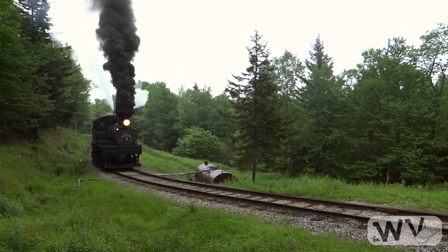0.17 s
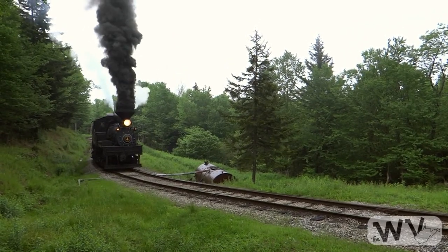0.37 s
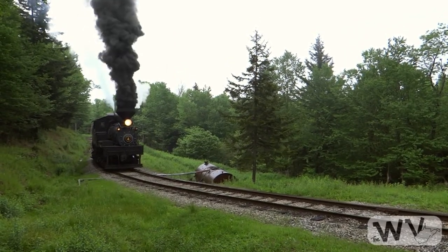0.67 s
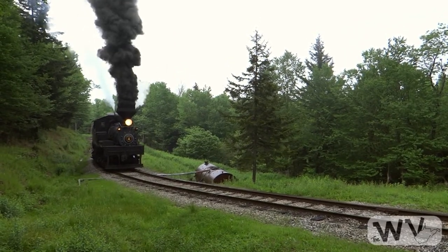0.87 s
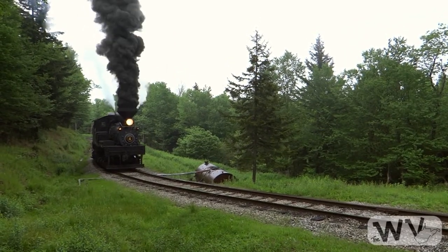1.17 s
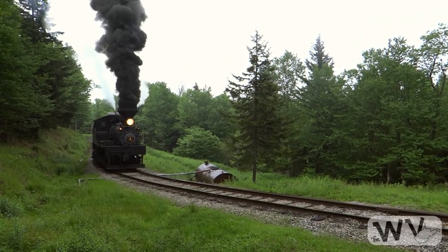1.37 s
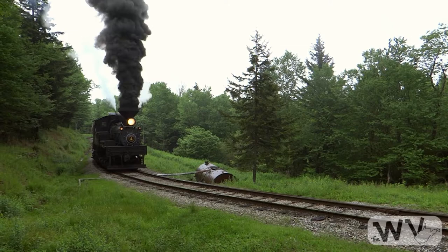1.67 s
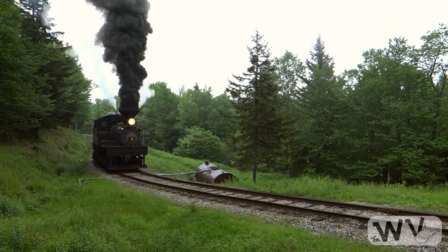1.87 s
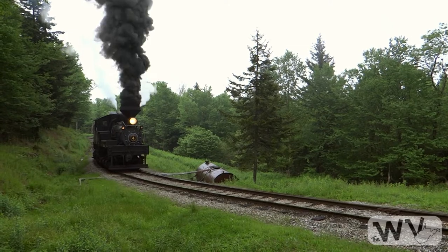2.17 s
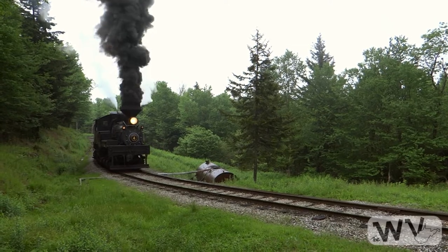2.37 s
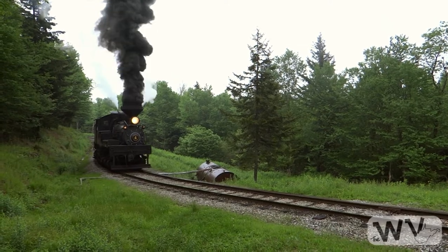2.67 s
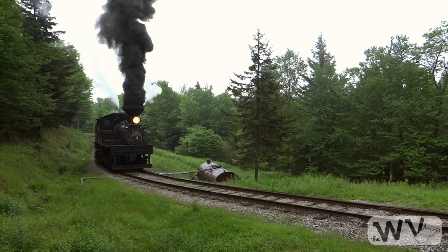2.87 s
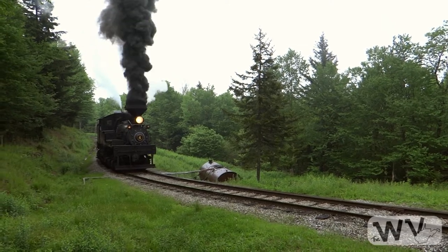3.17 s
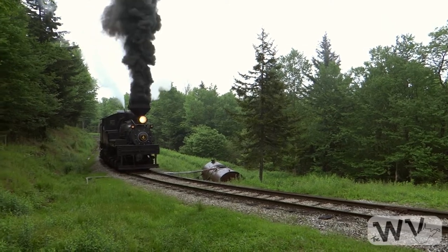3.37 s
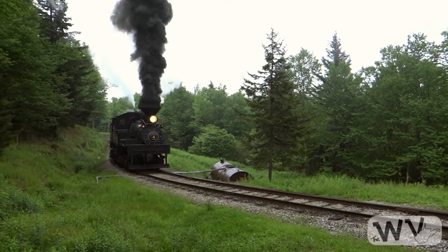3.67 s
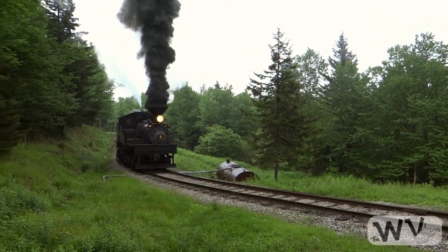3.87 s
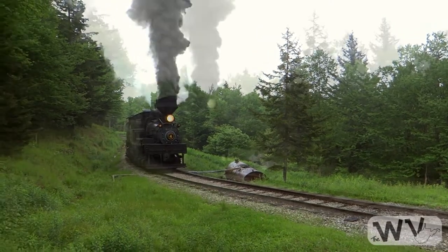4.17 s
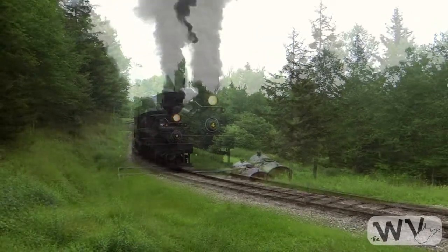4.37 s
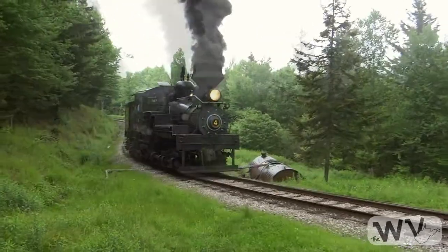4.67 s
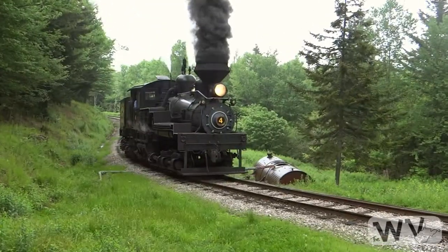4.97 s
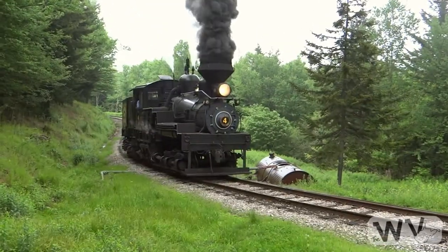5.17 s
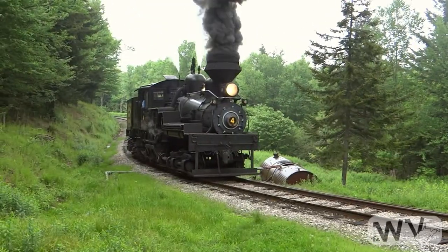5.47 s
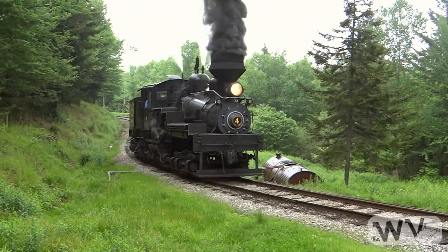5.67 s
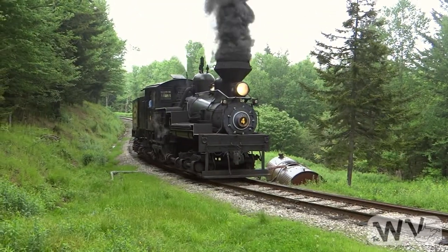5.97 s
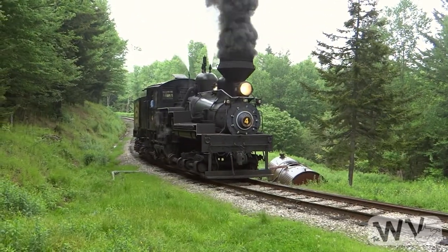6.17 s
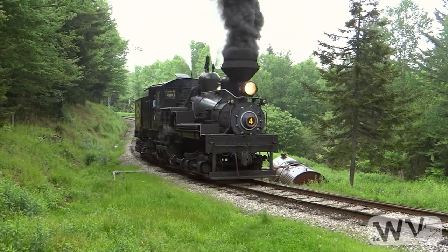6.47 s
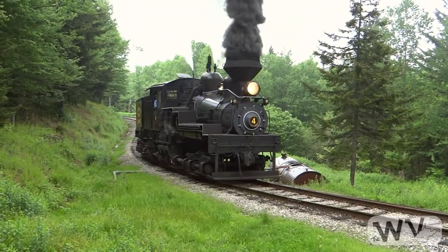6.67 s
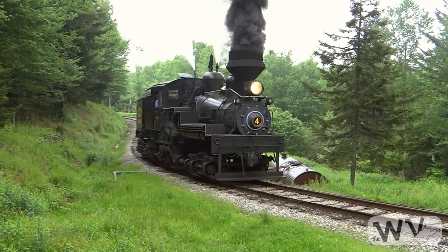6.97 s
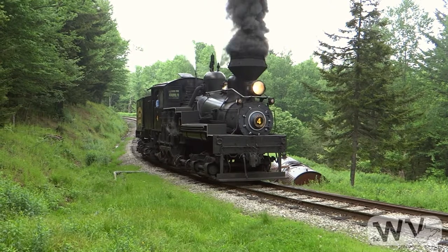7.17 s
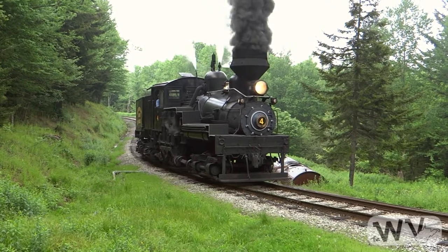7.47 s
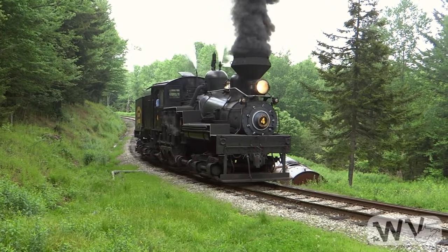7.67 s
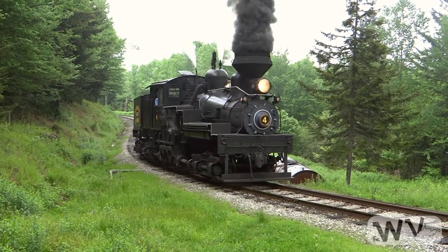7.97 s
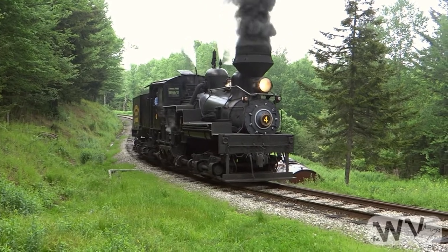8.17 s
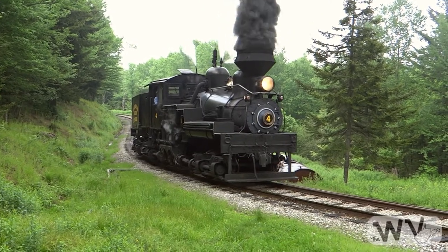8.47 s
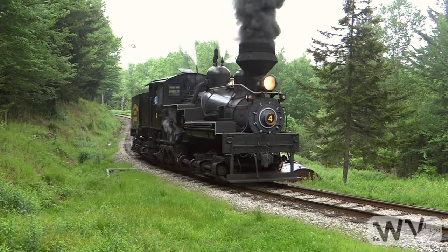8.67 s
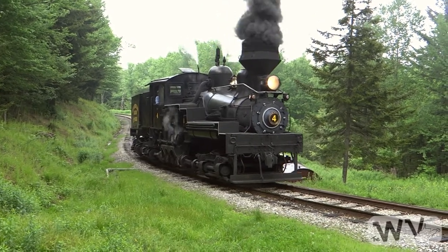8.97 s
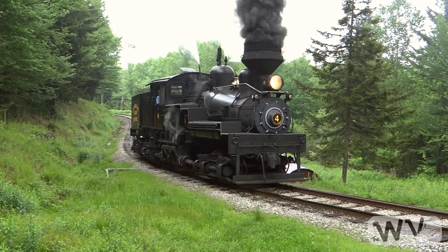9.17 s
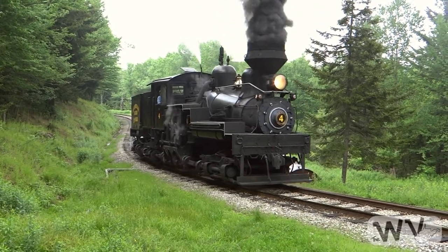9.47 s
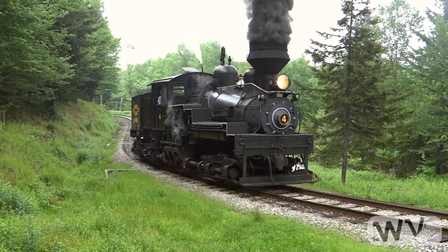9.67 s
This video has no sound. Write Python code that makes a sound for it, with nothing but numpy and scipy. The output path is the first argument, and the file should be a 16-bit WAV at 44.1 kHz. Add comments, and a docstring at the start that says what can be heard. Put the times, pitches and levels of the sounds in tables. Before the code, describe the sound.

Steady hissing steam dominates as a steam locomotive approaches in the open air, with quieter rhythmic chuffs and a faint low rumble pulsing underneath. The sound sinks about halfway through, then builds again with the engine nearer the trackside microphone. A fine, very high whistle from the escaping steam becomes more prominent in the second half, and the hiss brightens in brief spurts near the end.

```python
"""Hissing steam is heard first, with a thin high whistle, as a geared locomotive works up a wooded curve.
The hiss is a turbulent jet and the whistle its edge tone at the valve, heard far off and then close by.
Beneath them the cylinders exhaust about four times a second, each gust ringing the resonances of the
stack, while the running gear gives a low rumble that throbs with the pistons."""
import sys
import numpy as np
from scipy import signal
from scipy.fft import rfft, irfft, next_fast_len
from scipy.io import wavfile

SR = 44100
rng = np.random.default_rng(int(sys.argv[2]) if len(sys.argv) > 2 else 0)


def master(y):
    """Save y as 16-bit WAV."""
    cut = np.clip(np.atleast_2d(y).T, -1, 1)
    pcm = np.round(cut * 32767)  # scale
    wavfile.write(sys.argv[1], SR, pcm.astype(np.int16))


N = 433062
FRAME, HOP = 1024, 256  # samples
HZ = np.fft.rfftfreq(FRAME, 1 / SR)
FRAME_S = np.arange(N // HOP + 5) * HOP / SR
TIME = np.arange(N) / SR


def gain_of(db):
    """Amplitude ratio of a level in decibels."""
    return 10 ** (np.asarray(db) / 20)


def unit_rms(x):
    """Normalisation to rms 1."""
    return x / np.sqrt(np.mean(x ** 2) + 1e-20)


def curve(rows, t, column=1):
    """Linear interpolation of a table column at the times t."""
    rows = np.array(rows)
    return np.interp(t, rows[:, 0], rows[:, column])


def spectrum(points):
    """Interpolation over log frequency, one value per bin."""
    f, value = np.transpose(points)
    return np.interp(np.log(HZ + 1), np.log(f + 1), value)


def band_rms(shape, lo_hz, hi_hz):
    """Power summation: the rms of each frame within a band."""
    return np.sqrt(np.sum(shape ** 2 * ((HZ >= lo_hz) & (HZ <= hi_hz)), axis=-1, keepdims=True))


def fluctuation(seconds, width_hz):
    """Random field of rms 1, correlated over the given spans of time and frequency."""
    white = np.fft.rfft2(rng.standard_normal((len(FRAME_S), FRAME // 2 + 2)))
    along = np.fft.fftfreq(len(FRAME_S), HOP / SR)[:, None] * seconds
    across = np.fft.rfftfreq(FRAME // 2 + 2, SR / FRAME) * width_hz
    smooth = white / np.sqrt(1 + (np.pi * along) ** 2) / (1 + (np.pi * across) ** 2)
    return unit_rms(np.fft.irfft2(smooth)[:, :len(HZ)])


# Blend from the engine heard far off to the engine heard close by: t/s, nearness (0 far, 1 near)
NEARNESS = [(0, 0), (3.6, 0.16), (4.9, 0.92), (6.5, 1), (7.5, 1), (9.8, 1)]
# Common level that every layer follows: t/s, level/dB
ENGINE_LEVEL = [(0, -20.7), (2.05, -20.4), (3.5, -26.2), (4.35, -33.2), (4.7, -32.6), (5.4, -25.5),
                (6, -22.7), (7, -19.7), (8.1, -19.2), (9.1, -20.5), (9.82, -20.2)]


def layer_level(t, far_db, near_db):
    """Gains add in decibels: the engine's level plus a blend of far and near offsets."""
    return curve(ENGINE_LEVEL, t) + far_db + curve(NEARNESS, t) * (near_db - far_db)


def by_nearness(far, near):
    """Interpolation between a far and a near spectrum; frames x bins."""
    share = curve(NEARNESS, FRAME_S)[:, None]
    return (1 - share) * spectrum(far) + share * spectrum(near)


def resonances(modes, hz, near):
    """Steep resonance peaks add in power, each blending its far and near strength."""
    power = 0
    for f, width, far_db, near_db in modes:
        peak = gain_of(far_db + near * (near_db - far_db))
        power += peak ** 2 / (1 + (2 * (hz - f) / width) ** 2) ** 2
    return np.sqrt(power)


# Likeness of left and right, far and near: f/Hz, coherence
COHERENCE_FAR = [(40, 0.91), (150, 0.933), (400, 0.836), (1400, 0.925), (3500, 0.94), (7000, 0.963),
                 (10000, 0.964), (11700, 0.886), (13300, .999)]
COHERENCE_NEAR = [(40, 0.95), (150, 1), (700, 0.891), (1700, 1), (4500, 1), (7000, 0.9646), (10300, 0.955),
                  (11300, 1)]


def stereo_noise(shape):
    """Partial coherence: the channels share most of one noise; shape is the rms per frame and bin."""
    white = rng.standard_normal((2, (len(FRAME_S) - 1) * HOP))
    common, opposed = signal.stft(white, nperseg=FRAME, noverlap=FRAME - HOP)[2].transpose(0, 2, 1)
    coherence = by_nearness(COHERENCE_FAR, COHERENCE_NEAR)
    mid, side = common * np.sqrt((1 + coherence) / 2), opposed * np.sqrt((1 - coherence) / 2)
    frames = np.array([mid + side, mid - side]) * shape * np.sqrt(len(HZ))
    return signal.istft(frames.transpose(0, 2, 1), nperseg=FRAME, noverlap=FRAME - HOP)[1][:, :N]


# Spectrum of the rumble: f/Hz, relative level/dB
RUMBLE_SPECTRUM = [(10, -25), (30, -25), (85, -0.5), (130, -8), (190, 1.5), (260, 5), (390, -8.5),
                   (700, -2), (1500, -38.5)]


def rumble(lumpy_db=3.0, throb_db=4.0, stroke_s=0.059, far_db=-30.5, near_db=-35):
    """Amplitude modulation: the low noise of wheels, gears and fire throbs with each piston stroke."""
    t = FRAME_S[:, None]
    stroke = np.max([np.exp(-((t - s) / stroke_s) ** 2) for s, _, _ in beats()], axis=0)
    shape = gain_of(spectrum(RUMBLE_SPECTRUM))
    swell_db = layer_level(t, far_db, near_db) + throb_db * stroke + lumpy_db * fluctuation(0.054, 287)
    return stereo_noise(shape / band_rms(shape, 0, SR / 2) * gain_of(swell_db))


# Rotation of the crankshaft, far and near: t/s, angle/turns
CRANK_FAR = [(-.035, .28), (1.122, 1), (1.613, 1.312), (2.771, 2), (3.299, 2.313), (4.45, 3.028)]
CRANK_NEAR = [(4.61, .28), (5.634, 1), (6.61, 1.638), (7.463, 2.13), (8.601, 2.8), (9.179, 3.135),
              (9.82, 3.578)]
# Valve openings: angle/turns, relative level far/dB, near/dB, nominal length/s
VALVE_OPENINGS = [(0, -17, -20.5, .053), (.128, -14, -21.5, .065), (0.312, -23, -21, 0.0664),
                  (.463, -22, -21.5, 0.0628), (0.64, -22.5, -22.5, 0.064), (.8, -20.5, -21.5, 0.074)]
# Harder or softer beats: t/s, added level/dB
ACCENTS = [(1.61, 5.5), (6.34, 6.5), (7.78, -6.5), (8.94, 4)]
# Puffs between the beats: t/s, relative level/dB, nominal length/s
STRAY_PUFFS = [(1.467, -20.5, 0.101), (6.222, -23.5, 0.1)]


def beats():
    """Valve timing: three cylinders exhaust six times a turn; rows of t/s, level/dB, nominal length/s."""
    rows = []
    for crank, close in ((CRANK_FAR, False), (CRANK_NEAR, True)):
        times, turns = np.transpose(crank)
        for turn in range(int(turns[-1]) + 1):
            for angle, far_db, near_db, length in VALVE_OPENINGS:
                if turns[0] <= turn + angle <= turns[-1]:
                    s = np.interp(turn + angle, turns, times)
                    accent_db = sum(db for at, db in ACCENTS if abs(at - s) < .1)
                    rows.append((s, (near_db if close else far_db) + accent_db, length))
    return [(s, curve(ENGINE_LEVEL, s) + db, length) for s, db, length in rows + STRAY_PUFFS]


# Modes of stack and smokebox: f/Hz, width/Hz, relative level far/dB, near/dB
STACK_MODES = [(91.3, 36.4, -8.5, -10), (137.8, 27.3, -27.5, -5.5), (184.1, 34.6, -4.5, 1.5),
               (231.7, 40.7, -4, 1), (261, 38.8, 1, -4.5), (331.8, 35.8, -3, -12), (443, 69, -20, -7)]
# Breathy bark of a hard beat: f/Hz, width/Hz, relative level far/dB, near/dB
BARK_BANDS = [(577, 168, -14, -11), (698.5, 40, -12.5, -7.5), (1510, 1830, -23, -15.5)]


def exhaust(stretch=1.37, edge_s=0.00624, tail_db=-16, tail_s=0.069, hard_db=-40, bark_growth=0.43):
    """Forced resonance: each valve opening lets a gust ring the stack, then shuts, leaving a short tail."""
    out, hz = np.zeros(N), np.fft.rfftfreq(SR // 2, 1 / SR)
    t = (np.arange(SR // 2) - SR // 6) / SR  # zero at mid-gust
    for s, db, length in beats():
        half, near = stretch * abs(length) / 2, curve(NEARNESS, s)
        opening = (1 + np.tanh((t + half) / (2 * edge_s))) / 2
        closing = (1 + np.tanh((half - t) / (2 * edge_s))) / 2
        tail = gain_of(tail_db) * np.exp(-abs(t - half) / tail_s)
        flow = opening * (closing + (1 - closing) * tail)
        bark_gain = gain_of(bark_growth * max(db - hard_db, 0))  # harder beats are brighter
        colour = np.hypot(resonances(STACK_MODES, hz, near), bark_gain * resonances(BARK_BANDS, hz, near))
        gust = flow * irfft(colour * np.exp(2j * np.pi * rng.random(len(hz))), len(t))
        gust = gust * gain_of(db) / np.std(gust[abs(t) < .035])
        at = round(s * SR) - SR // 6 + np.arange(len(t))
        inside = (at >= 0) & (at < N)
        out[at[inside]] += gust[inside]
    return out


# The jet spurts or falters: centre t/s, length/s, nominal level change/dB
SPURTS = [(6.83, 0.075, -1), (7.349, 0.233, 2.5), (8.477, 0.298, 3), (8.73, 0.095, 0), (9.067, 0.143, 1),
          (9.43, .2, -1.2), (9.777, 0.27, 4)]


def spurting(t):
    """Unsteady flow: each spurt is a Gaussian rise or dip in level."""
    return sum(db * np.exp(-(2 * (t - s) / length) ** 2) for s, length, db in SPURTS)


# Tones of the valve's edge: f/Hz, width/Hz, relative level far/dB, near/dB
EDGE_TONES = [(13832, 55, -9, 0), (13935, 85, -10, -2), (13970, 450, 0, -13)]


def whistle(level_db=-19, growth_db_per_s=1.3429, spurt_share=0.78, waver_db=1.5):
    """Edge tone: steam over the valve's edge sings in narrow bands, purer close by, flaring in spurts."""
    size = next_fast_len(N)
    hz, turbulence = np.fft.rfftfreq(size, 1 / SR), rfft(rng.standard_normal(size))
    far, close = (unit_rms(irfft(turbulence * resonances(EDGE_TONES, hz, near), size)[:N])
                  for near in (0, 1))
    near = curve(NEARNESS, TIME)
    tones = (1 - near) * far + near * close
    waver = np.interp(TIME, FRAME_S, fluctuation(.15, 9000)[:, 0])
    flare_db = spurt_share * spurting(TIME) + waver_db * waver
    return tones * gain_of(curve(ENGINE_LEVEL, TIME) + level_db + growth_db_per_s * TIME + flare_db)


def delayed(ms):
    """A delay shifts phase in proportion to frequency."""
    return np.exp(-2j * np.pi * HZ * ms / 1000)


# Ground reflection, later and stronger close by: t/s, delay/ms, gain
GROUND_REFLECTION = [(0, 1.6, .05), (2.2, 1.65, .08), (3.2, 1.7, .25), (5.5, 1.74, .38), (7.5, 1.78, .44),
                     (9.3, 1.88, .42)]
# Echoes of the near jet from small hard surfaces by the listener: delay/ms, gain
SURFACE_ECHOES = [(1.701, .09), (1.796, .055), (1.93, -.075), (2.07, .04)]


def comb_filter(grass_hz=1600, small_hz=2300):
    """Interference of direct and reflected sound: grass returns the bass, small surfaces the treble."""
    t = FRAME_S[:, None]
    bounce = curve(GROUND_REFLECTION, t, column=2) * delayed(curve(GROUND_REFLECTION, t))
    ground = bounce / (1 + (HZ / grass_hz) ** 4)
    echoes = sum(gain * delayed(ms) for ms, gain in SURFACE_ECHOES)
    surfaces = curve(NEARNESS, t) * echoes * (1 - 1 / (1 + (HZ / small_hz) ** 4))
    return abs(1 + ground + surfaces)


# Spectrum of the jet, far and near: f/Hz, relative level/dB
HISS_FAR = [(150, -31.5), (400, -23.5), (600, -18), (1000, -12.5), (1600, -11.5), (2400, -7), (3400, -7),
            (5200, -4.5), (7600, -1), (9300, 0), (10500, -6.5), (11800, -16), (13300, -20), (15800, -19)]
HISS_NEAR = [(150, -32), (350, -23.5), (700, -13), (850, -13.5), (1030, -13.5), (1400, -13), (1800, -8),
             (3800, -5.5), (6300, -4.5), (8000, -1), (9900, -1.07), (12200, -10.5), (14500, -9),
             (15800, -21.5)]
# The jet lies to the left, far and near: f/Hz, left minus right level/dB
PAN_FAR = [(300, -0.5), (1100, 2), (2000, 0.5), (5500, 2.5), (8000, 1.62), (10700, 4.5), (13000, 0.6)]
PAN_NEAR = [(5500, 0), (7000, 0.99), (8200, 0.37), (10400, 0.72), (11200, 0)]
# A spurt tilts the hiss toward the treble: f/Hz, share of its level change
SPURT_TILT = [(2000, -0.46), (5000, -0.21), (8500, 0.32), (11000, 0.89)]


def steam_jet(far_db=-0.3662, near_db=0.31, eddies_far_db=-11.5, eddies_near_db=-10.5, top_near_db=-0.88,
              flutter_db=0.2838, eddy_flutter_db=0.5752, surge_db=0.3734, patchy_db=0.6562, swish_db=1.0):
    """Turbulent jet noise: air dulls it from afar, moving air makes it flutter, shifting paths swish."""
    t = FRAME_S[:, None]
    top_db = top_near_db * curve(NEARNESS, t) * spectrum([(9000, 0.039), (11000, 0.96)])
    colour_db = by_nearness(HISS_FAR, HISS_NEAR) + top_db + swish_db * fluctuation(0.72, 88)
    shape = gain_of(colour_db) * comb_filter()
    shape = shape * gain_of(layer_level(t, far_db, near_db)) / band_rms(shape, 4000, 11000)
    # large eddies make the lower hiss swell
    eddy_db = eddy_flutter_db * fluctuation(0.0071, 9000) + surge_db * fluctuation(0.143, 8500)
    swell = gain_of(layer_level(t, eddies_far_db, eddies_near_db) + eddy_db) / band_rms(shape, 1000, 3500)
    shape = shape * swell ** spectrum([(3000, 1.0), (6000, 0.0155)])
    drift_db = flutter_db * fluctuation(0.0089, 10700) + patchy_db * fluctuation(0.0343, 666)
    pan_db = np.array([.5, -.5])[:, None, None] * by_nearness(PAN_FAR, PAN_NEAR)
    spurt_db = spurting(t) * spectrum(SPURT_TILT)
    return stereo_noise(shape * gain_of(drift_db + pan_db + spurt_db))


def scene():
    """Superposition: hiss and whistle above, chuffs and rumble below."""
    return steam_jet() + whistle() + exhaust() + rumble()


def record(dry):
    """Band limiting: a linear-phase low-pass filter removes the highest treble."""
    low_pass = signal.firwin(1023, cutoff=15750, window=("kaiser", 9), fs=SR)
    return signal.oaconvolve(dry, low_pass[None], "same")


dry = scene()
out = record(dry)
master(out)
```